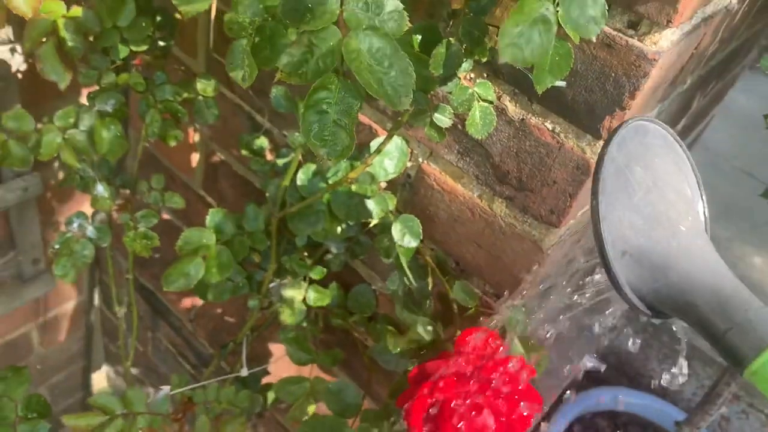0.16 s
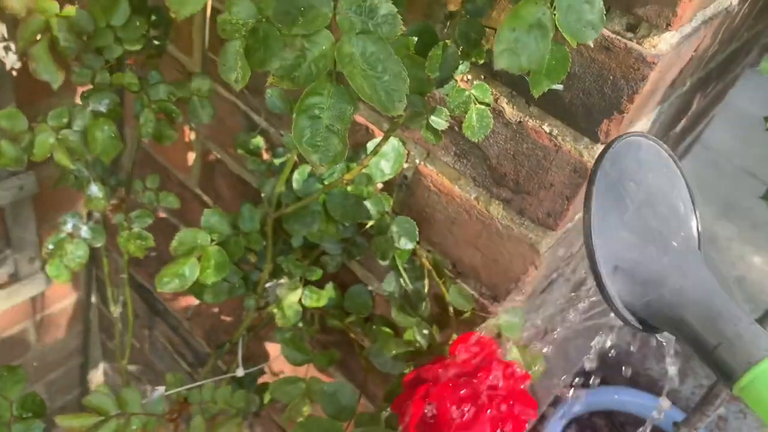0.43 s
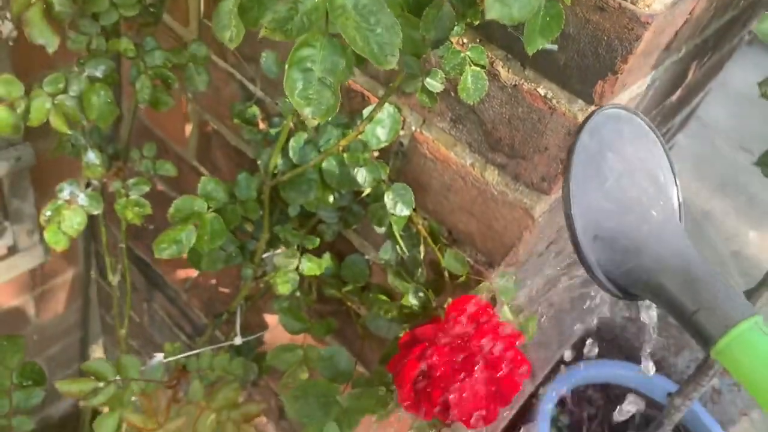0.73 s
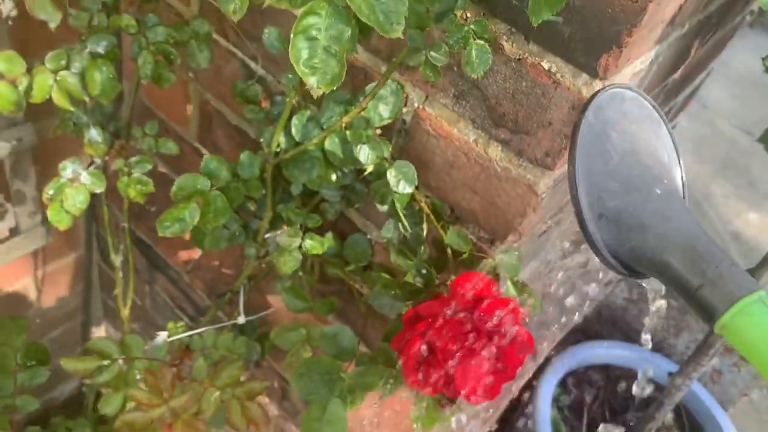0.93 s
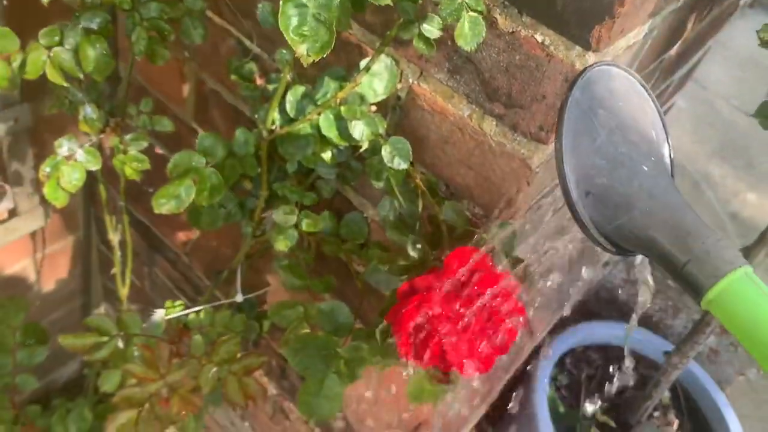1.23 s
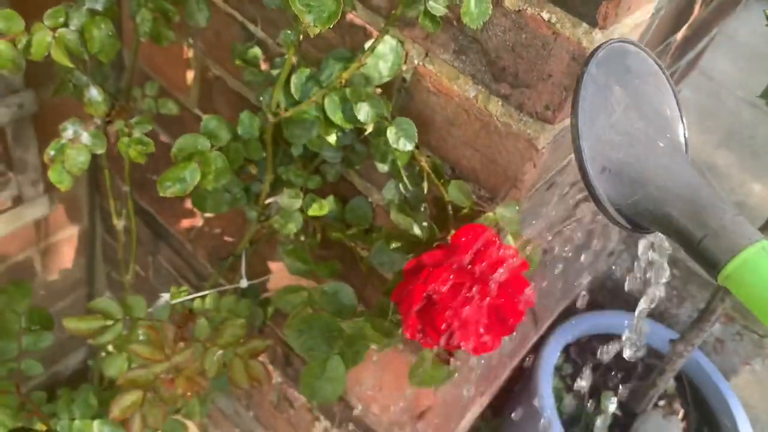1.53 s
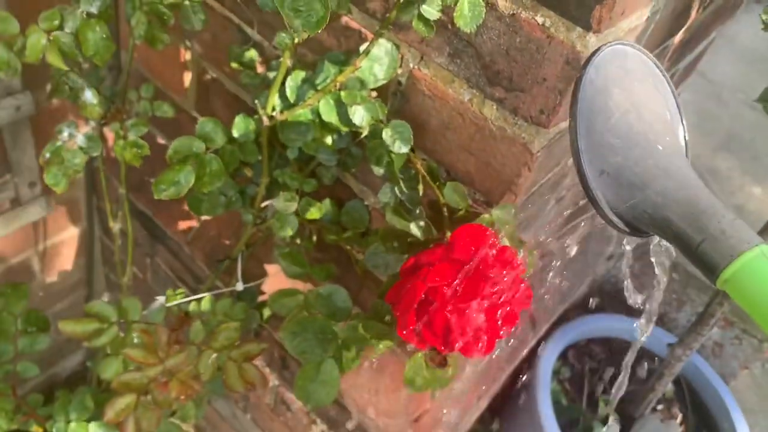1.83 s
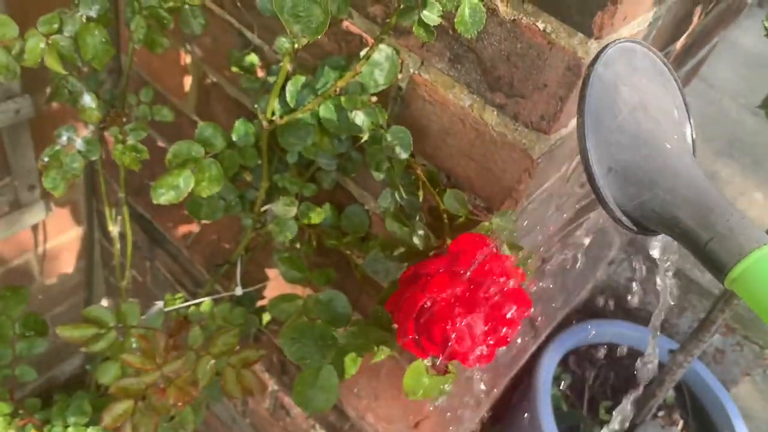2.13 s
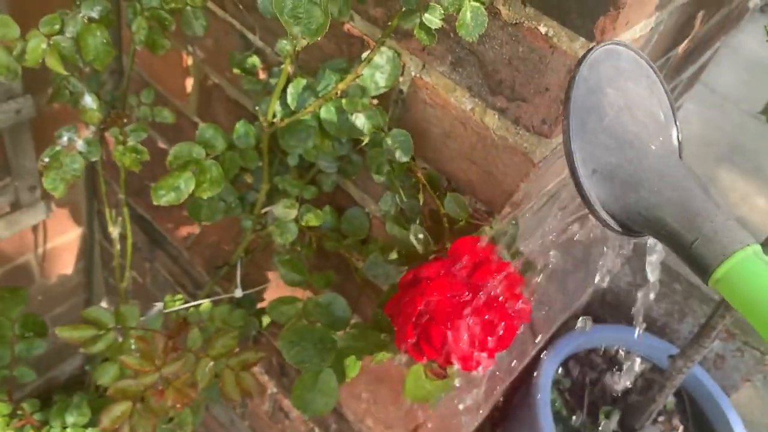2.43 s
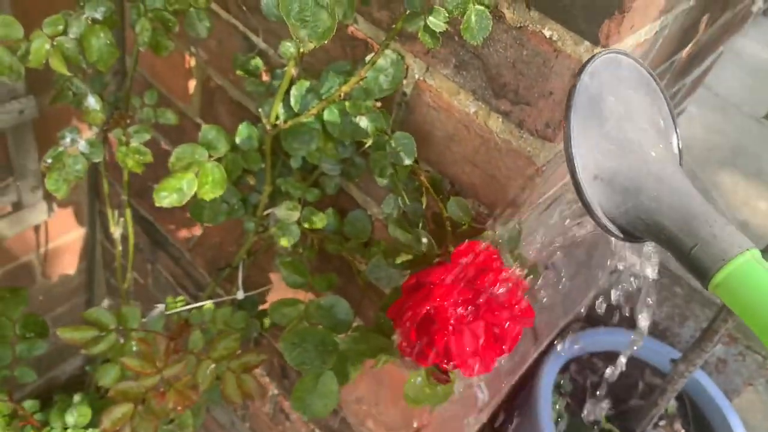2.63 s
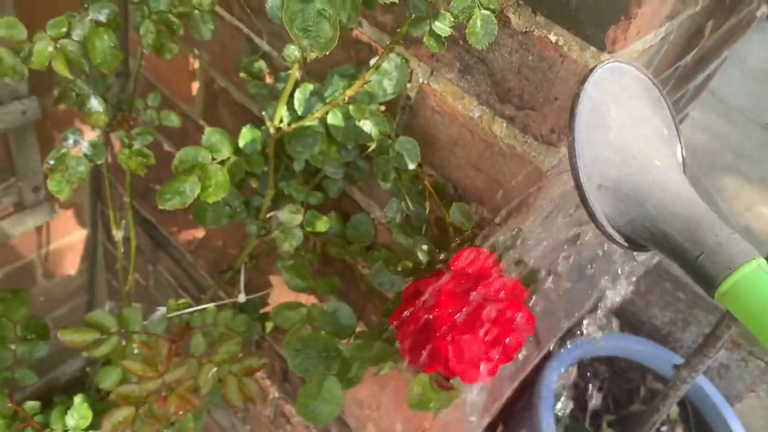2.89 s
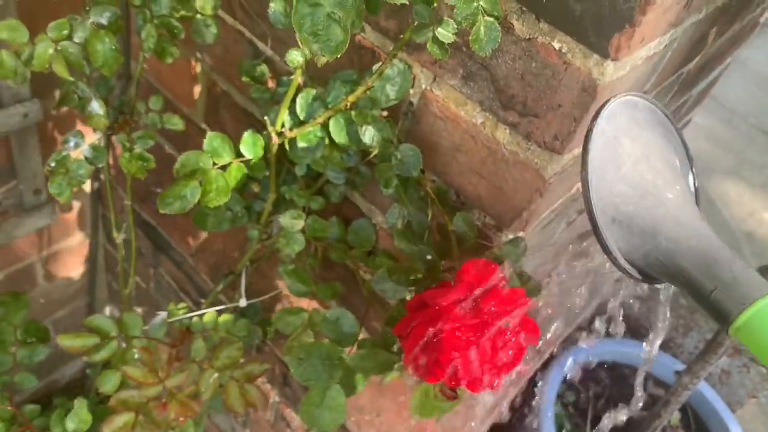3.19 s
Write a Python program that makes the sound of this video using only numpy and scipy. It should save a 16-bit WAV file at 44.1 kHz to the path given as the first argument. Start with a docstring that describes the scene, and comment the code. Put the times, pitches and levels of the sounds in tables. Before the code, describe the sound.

Water drops from a watering can spatter crisply on leaves and a pot in a garden

```python
"""Fat drops from a watering can smack on leaves, paving and a flower pot, by a rose bush and brick wall.
Each drop is a short impact that excites damped resonances, a bright noise splash and a dull thud.
Trapped bubbles sound as decaying tones, droplets as random soft splats, mist as grainy filtered noise.
The hand-held microphone takes a few soft bumps: low tones under bell-shaped envelopes, with rustle.
Behind lie filtered-noise breeze rumble and outdoor air, and the wavering sine of a far-off drone."""
import sys
import numpy as np
from scipy import signal
from scipy.fft import rfft, irfft
from scipy.io import wavfile

SR = 44100
rng = np.random.default_rng(int(sys.argv[2]) if len(sys.argv) > 2 else 0)


def inscribe(sig):
    """Save sig as 16-bit PCM at rate SR to the path in sys.argv[1].

    A 1-D sig is mono; a 2-D sig holds one channel per row.
    Samples are clipped to [-1, 1] before scaling.
    """
    pcm = np.round(np.clip(np.atleast_2d(sig).T, -1, 1) * 32767)
    wavfile.write(sys.argv[1], SR, pcm.astype(np.int16))


N = 147735  # samples

# Fat drops: [t/s, ring of the struck spot f/Hz, ring level/dB, splash level/dB, thud level/dB]
FAT_DROPS = [(0.0861, 4300, -35, -51, -51.5), (0.1031, 4600, -33, -35.5, -57),
             (0.1245, 4640, -33, -68, -48), (.2015, 2900, -45.5, -42.5, -53),
             (0.3246, 5400, -37.5, -65, -50.5), (0.3388, 9700, -25, -25.5, -47),
             (.402, 3780, -40, -45, -56), (0.4067, 5130, -37, -34, -49), (0.4857, 3800, -36, -52, -46),
             (0.5177, 3100, -33, -45, -42), (0.5494, 13000, -26.5, -31, -53),
             (0.5913, 4640, -41.5, -36, -45), (0.6081, 7400, -40, -34, -54), (.731, 6050, -53, -34.5, -52),
             (.877, 6240, -42.5, -41, -67), (0.9207, 5100, -38, -41.5, -51.5),
             (0.9587, 6000, -36.5, -32, -53.5), (0.9827, 5830, -68, -30.5, -82),
             (1.0567, 4060, -40, -43.5, -88), (1.1131, 6200, -58, -37.5, -82),
             (1.249, 4100, -40.5, -70, -62), (1.2787, 4000, -35.5, -57, -50),
             (1.3035, 5900, -31, -36, -41.5), (1.333, 7200, -44, -36, -84), (1.3923, 5790.0, -47, -36, -83),
             (1.4118, 5700, -37.5, -40.5, -81), (1.526, 4400, -40.5, -36.5, -48.5),
             (1.5687, 6300, -37, -62, -80), (1.596, 5860, -40, -48, -76), (1.6249, 4300, -30, -46, -49),
             (1.6632, 4240, -30.5, -36, -49.5), (1.6729, 5800, -43, -47, -75),
             (1.7477, 4170, -37, -30, -81), (1.772, 4760, -36.5, -36.5, -82),
             (1.8207, 3930, -32.5, -49, -79), (1.8456, 3900, -33, -59, -71), (1.9178, 6150, -40, -36, -78),
             (1.963, 4130, -27.5, -38.0, -37.5), (2.0078, 4450, -34.5, -44.5, -65),
             (2.058, 3270, -43.5, -38, -44.5), (2.1093, 4680, -35, -63, -55),
             (2.1937, 6300, -37.5, -32.5, -77), (2.2164, 3920, -31, -58, -52.5),
             (2.3714, 6460, -47, -38.5, -81), (2.436, 5950, -44.5, -34.5, -47.5),
             (2.5952, 4430, -35, -37, -55), (2.6474, 4250, -28, -29, -23.5),
             (2.7442, 6400, -34.5, -35, -84), (2.7769, 6300, -30.5, -30.5, -63),
             (2.8196, 5800, -38.5, -43, -47), (2.8643, 6240, -31.5, -68, -43.5),
             (2.8829, 6270, -25, -35, -37), (2.9534, 6150, -34, -31, -81),
             (3.1006, 4350, -32.5, -30.5, -50.5), (3.2221, 4100, -39, -40.5, -65),
             (3.2803, 4500, -38.5, -41, -80), (3.3013, 7460, -39, -38, -72), (3.338, 6030, -35.5, -39, -54)]
# Spectrum of a splash as the microphone colours it: [f/Hz, level/dB]
SPLASH_SPECTRUM = [(3000, -20), (6200, -0.5), (8400, -4), (9900, 11.5), (11900, -0.5), (13300, 9.5),
                   (14300, -0.5), (15200, -11), (17000, -97)]
# Modes of the flower pot, heard in a drop's thud: [f/Hz, level/dB]
POT_MODES = [(1450, -0.5), (1720, -3), (2080, 6), (2680, 8), (3220, 9), (3680, 12), (5300, 8)]
# Ringing bubbles: [t/s, starting pitch f/Hz, level/dB]
RINGING_BUBBLES = [(0.141, 3160, -45.5), (0.69, 6020, -42.5)]
# How much spray reaches the leaves: [t/s, relative level/dB]
SPRAY_LEVEL = [(0, -1.5), (.55, 1.5), (.82, -1.5), (1.03, 0), (2.05, .5), (2.3, -1.5), (3.35, 2)]
# Spectral shape of fine mist as the microphone colours it: [f/Hz, level/dB]
MIST_SPECTRUM = [(500, -5.5), (1300, 7.5), (2800, 3.5), (3900, 11.5), (5000, 4.5), (6100, 12), (8500, 3),
                 (10100, 15), (11900, 4.5), (13500, 14), (15500, -40)]
# Soft bumps of the microphone: [t/s, tone peak level/dB, half length/s, pitch at the centre f/Hz]
MICROPHONE_BUMPS = [(0.659, -35.5, 0.0094, 101), (0.693, -30.5, 0.016, 70.55), (0.863, -34, 0.0072, 103.6),
                    (2.185, -31, 0.013, 71.1), (2.808, -31, 0.0031, 280), (2.813, -26, 0.0092, 156.4),
                    (2.818, -31, 0.043, 49.06), (2.855, -28, 0.011, 125.3), (3.241, -38, 0.013, 141.7)]
# Level of the breeze rumble: [t/s, level/dB]
BREEZE_LEVEL = [(0, -52), (.55, -46), (.8, -54), (2.65, -56.5), (2.95, -43), (3.35, -44)]
# Spectral shape of the breeze rumble: [f/Hz, level/dB]
BREEZE_SPECTRUM = [(20, -27), (52, 7), (85, 5), (130, -12), (250, -48), (600, -59)]
# Outdoor air, the level about which it wanders: [t/s, level/dB]
AIR_MEAN_LEVEL = [(0, -55), (.8, -62), (1.1, -57.5), (2.55, -54), (3.35, -62)]
# Spectral shape of the outdoor air: [f/Hz, level/dB]
AIR_SPECTRUM = [(100, -10.5), (175, 2), (270, -1.5), (360, -16.5), (600, -15.5), (800, -23), (4000, -64)]
# Level of the far-off drone: [t/s, level/dB]
DRONE_LEVEL = [(0, -53), (.42, -46.5), (1.05, -69.5), (1.5, -50.5), (1.88, -49), (2.06, -63), (2.53, -51.5),
               (2.72, -58), (3.35, -64)]

# Impact: click with soft noise on both sides, close echoes, scattered water, faint tail
DROP_SIZE = 4096  # samples
LEAD_S = .008  # room ahead of the click
HALO_DB, HALO_S = -7, .0012  # soft noise on both sides of the click
ECHO_DB, ECHO_S = -11, .003  # level of each echo, longest delay
BUILD_S = .001
SCATTER_DB, SCATTER_S = -.5, .002  # level for fat drops, shortest decay time
SCATTER_RANGE = 2.5  # longest scatter decay over the shortest
SCATTER_LIKENESS = .8  # correlation of left and right
TAIL_DB, TAIL_S = -8.5, .011
SPREAD_S, SPREAD_DB = .00007, 1.2  # largest lag of the right side; spread of level difference

# Ring of the struck spot and broad smack around it
RING_LOW_HZ, RING_WIDTH_HZ, RING_PAN_DB = 3250, 900, -2.2
SMACK_HZ, SMACK_WIDTH_HZ, SMACK_DB = 6000, 2200, -3

POT_WIDTH_HZ, POT_BAND_HZ = 297, (950, 7500)
POT_PAN_BELOW_HZ, POT_PAN_DB = 1600, 6

BUBBLE_RING_S, BUBBLE_RISE_PER_S = 0.013, 0.35  # decay time; pitch rise as a fraction per second

DROPLETS_PER_S, DROPLET_LOW_HZ, DROPLET_HIGH_HZ = 75, 2900, 6570
DROPLET_DB, DROPLET_SPREAD_DB = -46.5, 2.5
DROPLET_FOLLOWS = 2.44  # dB of droplet level per dB of spray
DROPLET_RING_DB, DROPLET_THUD_DB = -9, -25  # against the splash
DROPLET_SCATTER_DB = 7

MIST_DB, MIST_PER_S, MIST_LIKENESS = -52, 1600, 0.02
MIST_HISS_DB = 1  # steady hiss against the grains

BUMP_SAG, BUMP_ROUGH_DB = .17, -7.5  # log pitch lost per half length; rustle under the tone

LOW_LIKENESS, AIR_LIKENESS = 0.74, 0.75
AIR_WANDER_DB = 2.2
DRONE_HZ, DRONE_WAVER_HZ = 73.6, 3.26  # centre; standard deviation of the turning points

CUTOFF_HZ = 16300


def drops(rows, scatter_db):
    """Impulsive excitation: each drop rings the spot it strikes, bursts brightly and thuds dully."""
    out = np.zeros((2, N))
    burst = response(SPLASH_SPECTRUM, size=512)
    for s, hz, ring_db, splash_db, thud_db in rows:
        hit = impact(scatter_db)
        ring = from_db(ring_db) * panned(RING_PAN_DB) * struck_spot(hit, hz)
        splash = from_db(splash_db) * unit_hit(through(hit, burst))
        thud = from_db(thud_db) * unit_hit(pot(hit))
        add(out, ring + splash + thud, s - LEAD_S)
    return out


def impact(scatter_db):
    """Transient superposition: an echoed click amid soft noise, then scatter and tail; left leads."""
    t = np.arange(DROP_SIZE) / SR - LEAD_S
    after = np.maximum(t, 0)
    clicks = np.zeros((2, DROP_SIZE))
    clicks[:, int(LEAD_S * SR)] = 1
    # nearby leaves and bricks echo with either sign
    for delay in rng.uniform(0, ECHO_S, size=4):
        clicks[:, int((LEAD_S + delay) * SR)] += from_db(ECHO_DB) * np.sign(rng.normal())

    halo = unit_hit(stereo_noise(SCATTER_LIKENESS, size=DROP_SIZE) * np.exp(-abs(t) / HALO_S))
    build = 1 - np.exp(-after / BUILD_S)
    scatter_s = SCATTER_S * SCATTER_RANGE ** rng.random()  # varies at random from splat to splat
    scatter_envelope = np.exp(-after / scatter_s) * build
    scatter = unit_hit(stereo_noise(SCATTER_LIKENESS, size=DROP_SIZE) * scatter_envelope)
    tail = unit_hit(stereo_noise(0, size=DROP_SIZE) * np.exp(-after / TAIL_S) * build)

    hit = unit_hit(clicks) + from_db(HALO_DB) * halo
    hit = hit + from_db(scatter_db) * scatter + from_db(TAIL_DB) * tail
    left, right = hit
    right = np.roll(right, round(rng.uniform(0, SPREAD_S) * SR))
    return np.array([left, right]) * panned(rng.normal(0, SPREAD_DB))


def struck_spot(hit, hz):
    """Damped resonance: a narrower ring at the spot's pitch joins a broader smack."""
    bright = signal.lfilter(*signal.butter(4, RING_LOW_HZ, "high", fs=SR), hit)
    ring = resonate(resonate(bright, hz, RING_WIDTH_HZ), hz, 2 * RING_WIDTH_HZ)
    smack = resonate(resonate(bright, SMACK_HZ, SMACK_WIDTH_HZ), hz, 2 * SMACK_WIDTH_HZ)
    return unit_hit(unit_hit(ring) + from_db(SMACK_DB) * unit_hit(smack))


def pot(hit):
    """Modal superposition: a few quickly damped modes make a hollow knock, the lowest leaning left."""
    knock = np.zeros((2, DROP_SIZE))
    for hz, db in POT_MODES:
        pan = panned(POT_PAN_DB * (hz < POT_PAN_BELOW_HZ))
        knock += from_db(db) * pan * unit_hit(resonate(hit, hz, POT_WIDTH_HZ))
    return signal.sosfilt(signal.butter(4, POT_BAND_HZ, "band", fs=SR, output="sos"), knock)


def bubbles():
    """Bubble resonance: air trapped in puddles gives a near-pure tone, rising a little as it dies."""
    out, t = np.zeros((2, N)), np.arange(DROP_SIZE) / SR
    envelope = np.exp(-t / BUBBLE_RING_S) * (1 - np.exp(-t / BUILD_S))
    for s, hz, db in RINGING_BUBBLES:
        tone = np.sin(2 * np.pi * np.cumsum(hz * (1 + BUBBLE_RISE_PER_S * t)) / SR)
        add(out, from_db(db) * (tone * envelope)[None], s)
    return out


def droplets():
    """Poisson process: small drops land at random in soft splats, louder as more spray arrives."""
    rows, s, spray_db = [], 0, in_time(SPRAY_LEVEL)
    while s < N / SR:
        following_db = DROPLET_FOLLOWS * spray_db[int(s * SR)]
        splash_db = DROPLET_DB + following_db + DROPLET_SPREAD_DB * rng.normal()
        ring_db = splash_db + DROPLET_RING_DB + DROPLET_SPREAD_DB * rng.normal()
        hz = DROPLET_LOW_HZ * (DROPLET_HIGH_HZ / DROPLET_LOW_HZ) ** rng.random()
        rows.append((s, hz, ring_db, splash_db, splash_db + DROPLET_THUD_DB))
        s += rng.exponential() / DROPLETS_PER_S
    return drops(rows, DROPLET_SCATTER_DB)


def mist():
    """Shot noise: a dense random train of tiny impacts merges with hiss into a soft, grainy sound."""
    landings = rng.random(N) < MIST_PER_S / SR
    grains = rms_one(stereo_noise(MIST_LIKENESS, size=N) * landings)
    spray = grains + from_db(MIST_HISS_DB) * stereo_noise(MIST_LIKENESS, size=N)
    coloured = rms_one(through(spray, response(MIST_SPECTRUM, size=1024)))
    return from_db(in_time(SPRAY_LEVEL) + MIST_DB) * coloured


def bumps():
    """Frequency glide: each bump is a brief low tone sagging in pitch, with a little rustle."""
    out, t = np.zeros((2, N)), np.arange(-SR // 8, SR // 8) / SR
    for s, db, half_s, hz in MICROPHONE_BUMPS:
        pitch = hz * np.exp(-BUMP_SAG * np.clip(t / half_s, -2, 2))
        tone = np.sin(2 * np.pi * np.cumsum(pitch) / SR)
        low = signal.butter(4, 2 * hz, fs=SR, output="sos")
        rustle = rms_one(signal.sosfilt(low, stereo_noise(0, size=len(t))))
        envelope = np.exp(-.5 * (t / half_s) ** 2)
        bump = (tone + from_db(BUMP_ROUGH_DB) * rustle) * envelope
        add(out, from_db(db) * bump, s + t[0])
    return out


def drone():
    """Frequency modulation: the far-off drone is one sine whose pitch wavers slowly at random."""
    pitch = DRONE_HZ + DRONE_WAVER_HZ * wander(count=30)
    tone = np.sqrt(2) * np.sin(2 * np.pi * np.cumsum(pitch) / SR)  # rms 1
    return from_db(in_time(DRONE_LEVEL)) * tone


def breeze():
    """Spectral shaping: low-passed noise, largely shared by both sides, swells as breeze rumble."""
    noise = stereo_noise(LOW_LIKENESS, size=N)
    rumble = rms_one(through(noise, response(BREEZE_SPECTRUM, size=DROP_SIZE)))
    return from_db(in_time(BREEZE_LEVEL)) * rumble


def outdoor_air():
    """Amplitude modulation: the level of filtered noise wanders gently."""
    noise = stereo_noise(AIR_LIKENESS, size=N)
    air = rms_one(through(noise, response(AIR_SPECTRUM, size=DROP_SIZE)))
    return from_db(in_time(AIR_MEAN_LEVEL) + AIR_WANDER_DB * wander(count=60)) * air


def from_db(db):
    """Logarithmic level: decibels to amplitude gain."""
    return 10 ** (np.asarray(db) / 20)


def rms_one(x):
    """Power normalisation: scale to rms 1."""
    return x / np.sqrt(np.mean(x ** 2) + 1e-30)


def unit_hit(x):
    """Energy normalisation: scale a stereo hit to the energy of 10 ms at rms 1."""
    return x / np.sqrt(np.sum(x ** 2) / (2 * .01 * SR) + 1e-30)


def in_time(rows):
    """Linear interpolation: a curve of (t/s, value) at every sample."""
    return np.interp(np.arange(N) / SR, *np.transpose(rows))


def wander(count):
    """Random modulation: straight lines join count normally distributed points."""
    return np.interp(np.arange(N), np.linspace(0, N, count), rng.standard_normal(count))


def add(out, sound, s):
    """Superposition: mix a sound in from time s."""
    i = int(s * SR)
    a, b = max(i, 0), min(i + sound.shape[1], N)
    if b > a:
        out[:, a:b] += sound[:, a - i:b - i]


def panned(db):
    """Interaural level difference: gains that make the left louder than the right by db."""
    return from_db(np.array([[db], [-db]]) / 2)


def stereo_noise(likeness, size):
    """Partial correlation: white noise from a mid part alike and a side part opposed in the two sides."""
    c = np.clip(likeness, -.99, .99)
    mid, side = rng.standard_normal((2, size))
    return (np.sqrt(1 + c) * mid + np.sqrt(1 - c) * side * [[1], [-1]]) / np.sqrt(2)


def response(points, size):
    """Minimum phase: causal impulse response with a spectrum of (f/Hz, level/dB), by folded cepstrum."""
    hz, db = np.transpose(points)
    grid = np.maximum(np.fft.rfftfreq(size, 1 / SR), 1)
    gain = from_db(np.interp(np.log(grid), np.log(hz), db))
    cepstrum = irfft(np.log(gain))
    cepstrum[1:size // 2] *= 2
    cepstrum[size // 2 + 1:] = 0
    return irfft(np.exp(rfft(cepstrum)))


def through(x, impulse):
    """Convolution: pass stereo sound through an impulse response."""
    return signal.fftconvolve(x, impulse[None], axes=1)[:, :x.shape[1]]


def resonate(x, hz, width_hz):
    """Damped oscillator: a pole pair whose radius sets the bandwidth."""
    r = np.exp(-np.pi * width_hz / SR)
    return signal.lfilter([1, 0, -1], [1, -2 * r * np.cos(2 * np.pi * hz / SR), r * r], x)


def scene():
    """Superposition: water and bumps over the garden's background."""
    water = drops(FAT_DROPS, SCATTER_DB) + bubbles() + droplets() + mist()
    background = drone() + breeze() + outdoor_air()
    return water + bumps() + background


def record(dry):
    """Low-pass filtering: an elliptic filter cuts the top steeply."""
    return signal.sosfilt(signal.ellip(10, .1, 80, CUTOFF_HZ, fs=SR, output="sos"), dry)


dry = scene()
out = record(dry)
inscribe(out)
```